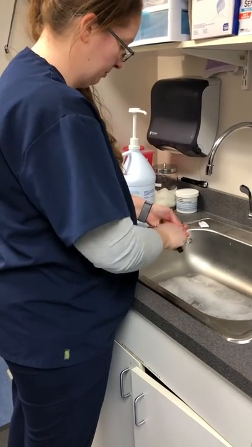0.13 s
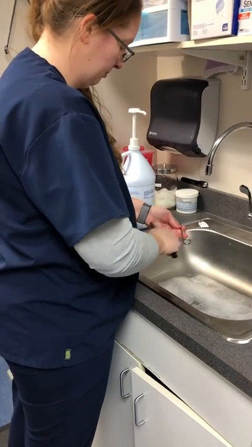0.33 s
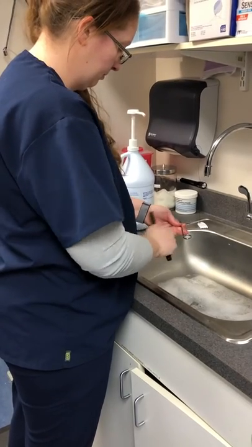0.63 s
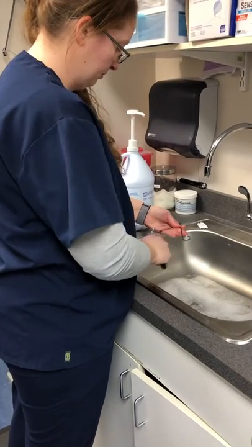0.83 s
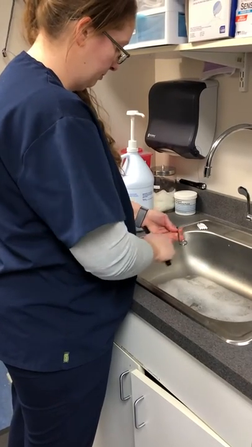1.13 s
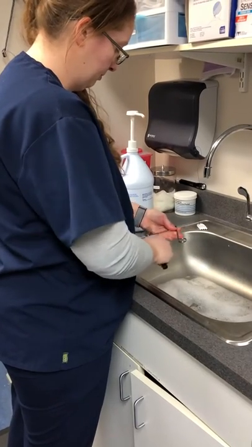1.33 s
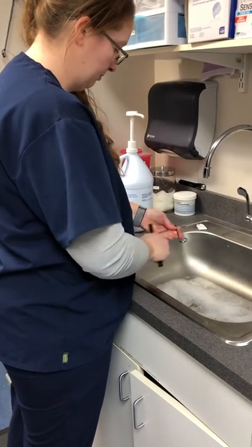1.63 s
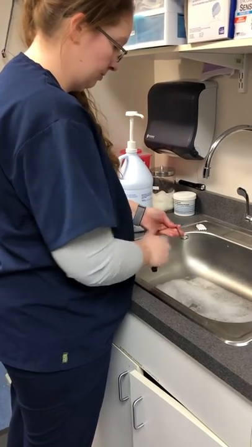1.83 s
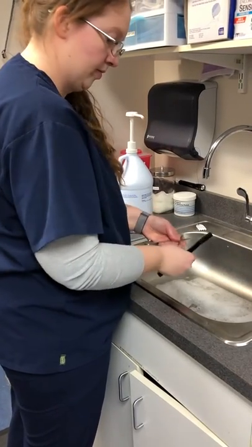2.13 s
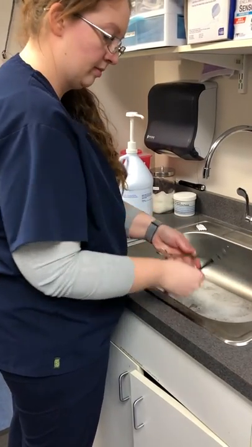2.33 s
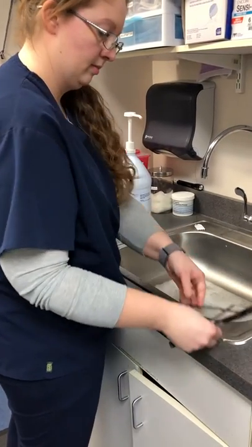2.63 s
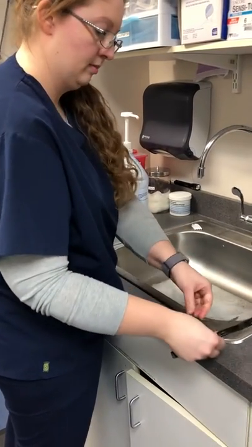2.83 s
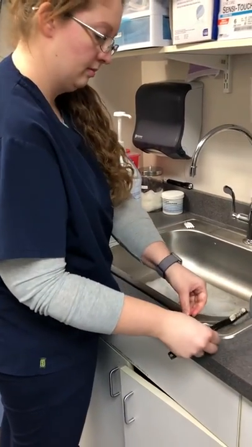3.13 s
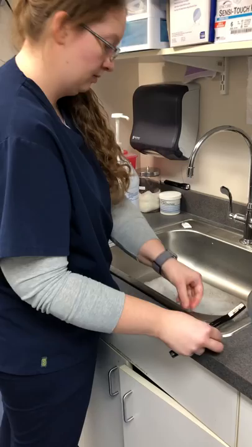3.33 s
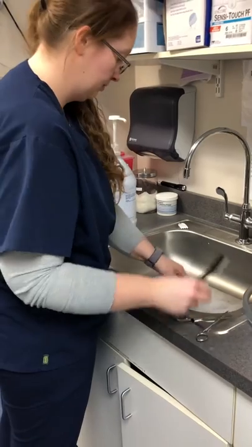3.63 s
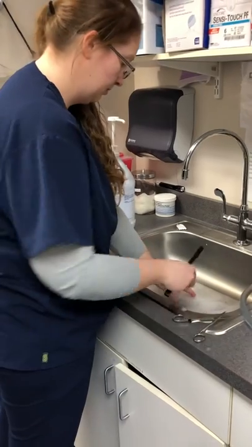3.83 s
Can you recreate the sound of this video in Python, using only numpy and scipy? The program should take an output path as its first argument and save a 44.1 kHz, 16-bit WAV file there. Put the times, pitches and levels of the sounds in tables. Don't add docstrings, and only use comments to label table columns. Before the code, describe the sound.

Quick raspy bristle scrubbing on a metal instrument, followed by sharp clatter on a hard countertop

```python
import sys
import numpy as np
from scipy import signal
from scipy.fft import rfft, irfft
from scipy.io import wavfile
from scipy.ndimage import uniform_filter1d

SR = 44100
rng = np.random.default_rng(int(sys.argv[2]) if len(sys.argv) > 2 else 0)


def linear_from_db(decibels):
    return 10 ** (np.asarray(decibels, float) / 20)


def store_pcm(level_fs):
    pcm = np.round(np.clip(level_fs, -1, 1) * 32767).astype(np.int16)
    wavfile.write(sys.argv[1], SR, np.atleast_2d(pcm).T)


N = 176400


def level(x, db):
    return x * linear_from_db(db) / np.sqrt(np.mean(x ** 2))


def curve(table, x):
    return np.interp(x, *np.array(table, float).T)


def colour(x, table):
    log_hz = np.log(np.fft.rfftfreq(len(x), 1 / SR) + 1)
    gain_db = curve([(np.log(f), db) for f, db in table], log_hz)
    return irfft(rfft(x) * linear_from_db(gain_db), len(x))


def band(x, hz, width):
    f = np.fft.rfftfreq(len(x), 1 / SR) + 1
    bell = np.exp(-.5 * (np.log(f / hz) / width) ** 2)
    return irfft(rfft(x) * bell, len(x))


def walk(rate):
    k = int(SR / rate)
    steps = np.repeat(rng.standard_normal(N // k + 1), k)
    return 1.3 * uniform_filter1d(uniform_filter1d(steps, k), k)[:N]


def add(track, s, sound):
    i = max(int(s * SR), 0)
    track[i:i + len(sound)] += sound[:N - i]


# frequency in Hz, density in dB per Hz.
AIR_SPECTRUM = [(24, -27), (36, -14), (80, -6), (320, -8.5), (600, -17.5), (1300, -22.5), (4740, -31.5),
                (16000, -43.5)]
# frequency in Hz, width in Hz, level in dB.
DUCT_RESONANCES = [(117.4, 33, -64.5), (193, 39, -71), (305.7, 95, -72), (507.5, 48, -69)]
AIR_DB = -59
FAN_HZ, BEAT_HZ, WEAKEST_S = 55.7, 0.94, 1.15
FAN_DB, SECOND_FAN_DB, OVERTONE_DB = -58, -2, -10


def motor(phase):
    return np.sin(phase) + linear_from_db(OVERTONE_DB) * np.sin(2 * phase)


def ventilation():
    t = np.arange(N) / SR
    air = level(colour(rng.standard_normal(N), AIR_SPECTRUM), AIR_DB)
    air = air * linear_from_db(.5 * walk(3.4))
    duct = sum(level(band(rng.standard_normal(N), hz, width / hz / 2), db)
               for hz, width, db in DUCT_RESONANCES)
    turn = 2 * np.pi * FAN_HZ * (t + 0.0002 * walk(12))
    lag = 2 * np.pi * BEAT_HZ * (t - WEAKEST_S) + np.pi
    fans = motor(turn) + linear_from_db(SECOND_FAN_DB) * motor(turn + lag)
    return air + duct + linear_from_db(FAN_DB) * fans


# frequency in Hz, density in dB per Hz.
CLOTH_SPECTRUM = [(700, 12), (1500, 0.5), (3000, 2), (5000, -0.5), (8000, -7.5), (14000, -22.5)]
# time in seconds, rustle level in dB.
SLEEVE_MOVES = [
    (0.0, -83),
    (1.9, -89),
    (2.15, -68),
    (2.35, -61),
    (2.55, -65),
    (2.75, -60.5),
    (2.95, -80),
    (3.7, -63.5),
    (3.8, -68.5),
    (4.0, -59),
]


def sleeves():
    patchy = rng.standard_normal(N) * linear_from_db(walk(90))
    hiss = level(colour(patchy, CLOTH_SPECTRUM), 0)
    return hiss * linear_from_db(curve(SLEEVE_MOVES, np.arange(N) / SR))


# frequency in Hz, 60 dB decay time in seconds.
ROOM_DECAY = [(200, 0.21), (1000, 0.29), (3000, 0.18), (7000, 0.2), (14000, 0.05)]
# frequency in Hz, gain in dB.
ROOM_COLOUR = [(150, 3), (600, 0), (1500, 1), (4000, 3), (14000, 0)]
ROOM_GAP_S, ROOM_BUILD_S = 0.0014, 0.0013


def room(x):
    t = np.arange(SR // 2) / SR
    late = np.maximum(t - ROOM_GAP_S, 0)
    tail = sum(band(rng.standard_normal(len(t)), hz, 1.0) * 1000 ** (-t / curve(ROOM_DECAY, hz))
               for hz in 150 * 2 ** np.arange(7.))
    tail = colour(tail, ROOM_COLOUR) * (1 - np.exp(-late / ROOM_BUILD_S))
    return signal.fftconvolve(x, tail / np.sqrt(np.sum(tail ** 2)))[:N]


HELD_T60_S = .042


def ring(modes, extra_db, tune):
    t = np.arange(SR // 4) / SR
    hz, db, t60 = np.array(modes, float).T[:, :, None]
    t60 = np.minimum(t60, HELD_T60_S)
    sign = (-1.) ** np.arange(len(modes))[:, None]
    partials = np.sin(2 * np.pi * hz * tune * t) * 1000 ** (-t / t60)
    return np.sum(sign * linear_from_db(db + extra_db[:, None]) * partials, axis=0)


# frequency in Hz, level in dB, 60 dB decay time in seconds.
STEEL_MODES = [(2765, -8, .05), (2932, -3, .06), (3045, -9, .05), (3725, -18, .04), (4590, -16, .04),
               (5600, -16, .04), (5830, -16, .04), (6202, -10, .05), (6412, -10, .05), (6767, -14, .04),
               (7600, -17, .03), (9028, -17, .03), (10800, -21, .03), (12300, -22, .025)]
# frequency in Hz, level in dB, 60 dB decay time in seconds.
COUNTER_MODES = [(135, -8, .05), (335, -10, .035), (480, -9, .03), (595, -1, .035), (675, -2, .035),
                 (862, -5, .03), (918, -5, .035), (990, -8, .03), (1200, -7, .025), (1450, -8, .025),
                 (1750, -9, .02), (2075, -7, .02), (2355, -3, .03), (2600, -7, .02)]
# frequency in Hz, gain in dB.
RATTLE_COLOUR = [(300, 9), (600, 15.5), (1200, -0.5), (2500, 2), (4000, -5), (6500, -1), (9500, -3.5),
                 (16000, -6.5)]
RATTLE_T60_S, RATTLE_RISE_S, RATTLE_WIDTH = .07, .0008, 0.76
SPOT_DB, SPOT_DETUNE, ARM_DETUNE = 1.2, .01, .012
CHATTER_PER_S, CHATTER_T60_S, BOUNCE_SHARE = 1500, .035, .4


def contact(knock_db, rattle_db, hz, steel_db=None):
    t = np.arange(SR // 4) / SR
    spot, chance = rng.standard_normal((3, 14)), rng.random((2, len(t)))

    bounces = (chance[0] < CHATTER_PER_S / SR) * (2 * chance[1] - 1)
    chatter = BOUNCE_SHARE * bounces * 1000 ** (-t / CHATTER_T60_S)
    chatter[0] = 1

    soft_db = -10 * np.log10(1 + (np.array(COUNTER_MODES)[:, 0] / hz) ** 4)
    counter_tune = 1 + SPOT_DETUNE * spot[2][:, None]
    body = ring(COUNTER_MODES, knock_db + soft_db + SPOT_DB * spot[1], counter_tune)
    if steel_db is not None:
        reach_db = steel_db - 10 * np.log10(1 + (np.array(STEEL_MODES)[:, 0] / (2 * hz)) ** 4)
        for arm_tune in (1, 1 + ARM_DETUNE * spot[1][:, None]):
            body = body + ring(STEEL_MODES, reach_db - 2.5 + SPOT_DB * spot[0], arm_tune)

    noise = band(rng.standard_normal(len(t)), hz, RATTLE_WIDTH)
    rattle = level(colour(noise, RATTLE_COLOUR), rattle_db)
    rattle = rattle * (1 - np.exp(-t / RATTLE_RISE_S)) * 1000 ** (-t / RATTLE_T60_S)
    knocks = signal.fftconvolve(body, chatter / np.sqrt(np.sum(chatter ** 2)))[:len(t)]
    return knocks + rattle


# start in seconds, steel ring in dB, counter knock in dB, rattle in dB,
# contact sharpness in Hz.
CLAMP_HITS = [(3.0577, -53.5, -56.5, -50, 8900), (3.078, -46, -50, -48, 11000),
              (3.1052, -35, -34, -32.5, 4860), (3.118, -51, -34, -44, 1430), (3.134, -45.5, -58, -47, 5400),
              (3.2278, -66, -65, -55, 2420), (3.3004, -73, -44.5, -44.5, 3780),
              (3.3197, -45, -28.5, -35, 1720), (3.3429, -33.5, -42, -37, 6500),
              (3.3705, -49, -39.5, -34.5, 2200), (3.3963, -45, -40.5, -46.5, 4240),
              (3.356, -62, -43, -43.5, 1000)]
# start in seconds, counter knock in dB, rattle in dB,
# contact sharpness in Hz.
HANDLE_TAPS = [
    (1.766, -57, -55, 805),
    (3.5751, -45, -39.5, 2520),
    (3.585, -60, -64, 1600),
    (3.77, -92, -61, 3500),
    (3.786, -78, -68, 6440),
    (3.8152, -55.5, -49.5, 2040),
]


def clatter():
    out = np.zeros(N)
    for s, steel_db, knock_db, rattle_db, hz in CLAMP_HITS:
        add(out, s, contact(knock_db, rattle_db, hz, steel_db))
    for s, knock_db, rattle_db, hz in HANDLE_TAPS:
        add(out, s, contact(knock_db, rattle_db, hz))
    low_cut = signal.butter(2, 100, "high", fs=SR, output="sos")
    return signal.sosfilt(low_cut, out)


# start in seconds, length in seconds, level in dB,
# brightest frequency in Hz.
BRISTLE_SLIPS = [(0.0, 0.0065, -46, 8000), (0.032, 0.01, -46.5, 9050), (0.213, 0.019, -58.5, 7200),
                 (0.236, 0.027, -54, 7000), (0.284, 0.015, -46, 7400), (0.338, .035, -68, 9000),
                 (.497, 0.02, -57, 7500), (0.512, 0.022, -59, 10000), (0.539, 0.021, -49, 8100),
                 (0.567, 0.018, -46.5, 9200), (0.776, 0.013, -60.5, 10000), (0.814, 0.041, -51.5, 9500),
                 (.865, 0.021, -47.5, 10000), (1.061, 0.022, -58, 9750), (1.106, 0.014, -56, 8000),
                 (1.116, 0.02, -46.5, 9800), (1.155, 0.034, -60.5, 9000), (1.193, .018, -57, 9500),
                 (1.357, 0.029, -61, 7700), (1.398, .01, -56, 11000), (1.404, 0.019, -47.5, 9200),
                 (1.436, 0.022, -48.5, 8300), (1.671, 0.0081, -55.5, 12000), (1.701, 0.034, -57, 10000),
                 (1.713, 0.044, -50.5, 10900), (1.76, .019, -46, 13200), (1.786, 0.033, -68, 13000)]
# frequency in Hz, density in dB per Hz.
BRISTLE_SPECTRUM = [(300, 16), (700, 3), (1500, -5), (3380, 1), (4550, -2.5), (8660, -1.5), (12400, -4.5),
                    (16000, 0)]
SLIP_ATTACK_S, SLIP_FADE_S = 0.0026, 0.0092
BRISTLES_PER_S, BRISTLE_SPREAD_DB, UNEVEN_DB, PATCH_DB = 14000, 2.6, 1.4, 2.5
BRIGHT_DB, BRIGHT_WIDTH, BRUSH_RING_DB = -9, 0.3, -24


def brush():
    out, t = np.zeros(N), np.arange(SR // 8) / SR
    steel = ring(STEEL_MODES, np.zeros(len(STEEL_MODES)), 0.91)
    for s, length, db, hz in BRISTLE_SLIPS:
        chance = rng.random((3, len(t)))
        strength = linear_from_db(-BRISTLE_SPREAD_DB * np.log(chance[2]))
        clicks = (chance[0] < BRISTLES_PER_S / SR) * np.sign(chance[1] - .5) * strength
        rasp = level(colour(clicks, BRISTLE_SPECTRUM), 0)
        rasp = rasp + level(band(clicks, hz, BRIGHT_WIDTH), BRIGHT_DB)

        patch_db = PATCH_DB * rng.standard_normal(14) * (np.arange(14) > 0)
        grip = np.c_[np.geomspace(2000, 16000, 14), patch_db]

        swell = np.sin(np.pi * np.clip(t / length, 0, .72))
        let_go = np.exp(-np.maximum(t - length * 0.98, 0) / SLIP_FADE_S)
        push = swell * (1 - np.exp(-t / SLIP_ATTACK_S)) * let_go
        add(out, s, level(colour(rasp, grip), db) * push)
    out = out * linear_from_db(UNEVEN_DB * walk(250))
    tickle = signal.fftconvolve(out, steel / np.sqrt(np.sum(steel ** 2)))[:N]
    return out + linear_from_db(BRUSH_RING_DB) * tickle


BRUSH_ROOM_DB, HIT_ROOM_DB = -9, -1.5


def scene():
    scrub, hits = brush(), clatter()
    wet = room(linear_from_db(BRUSH_ROOM_DB) * scrub + linear_from_db(HIT_ROOM_DB) * hits)
    return (scrub + hits + wet + sleeves() + ventilation())[None, :]


def band_limit(x):
    return signal.sosfilt(signal.butter(12, 16460, fs=SR, output="sos"), x)


def record(dry):
    keep = np.clip((15850 - np.fft.rfftfreq(N, 1 / SR)) / 150 + .5, 0, 1)
    mix = irfft(rfft(dry) * keep, N)
    return band_limit(mix)


dry = scene()
out = record(dry)
store_pcm(out)
```